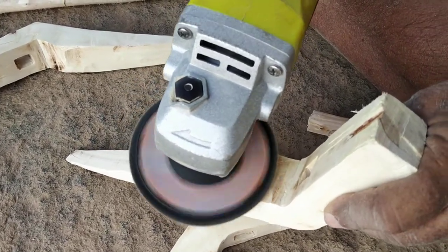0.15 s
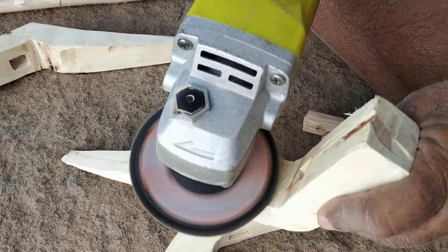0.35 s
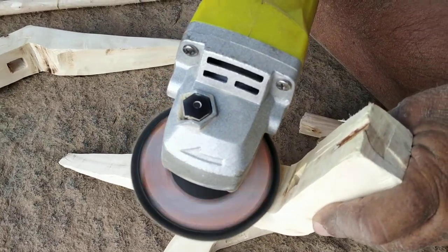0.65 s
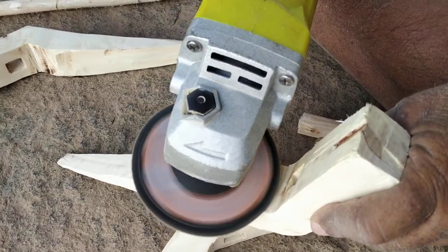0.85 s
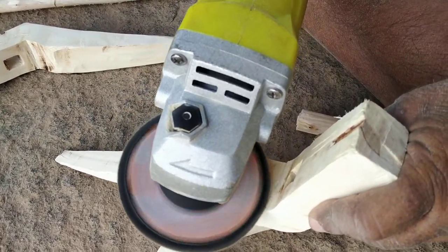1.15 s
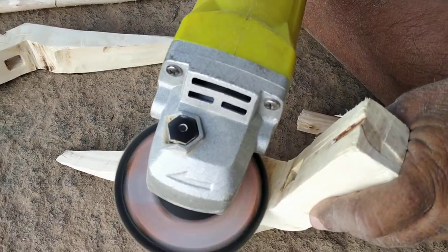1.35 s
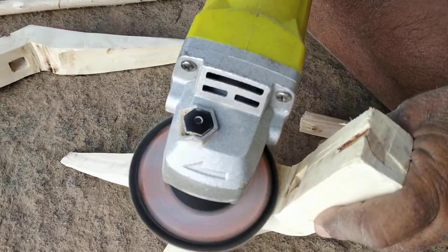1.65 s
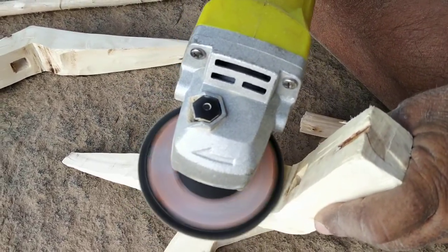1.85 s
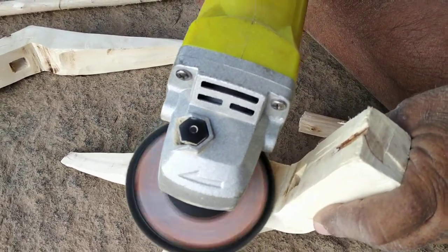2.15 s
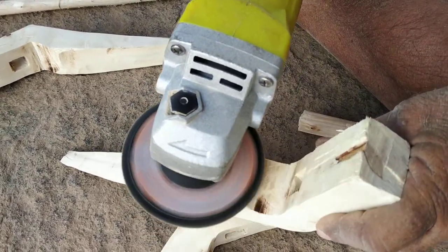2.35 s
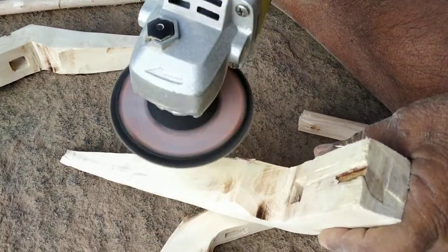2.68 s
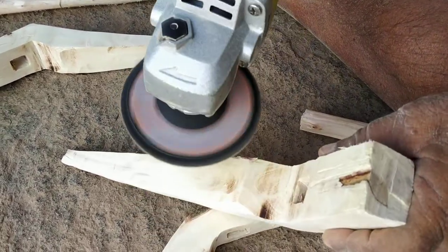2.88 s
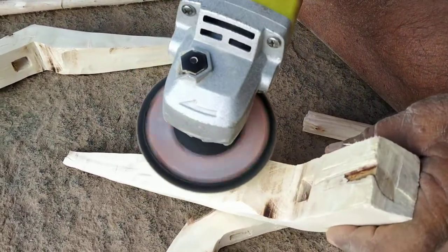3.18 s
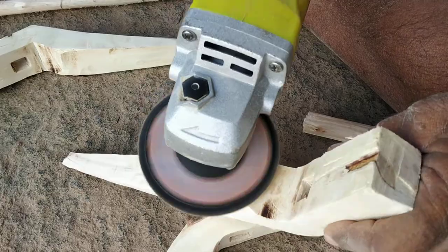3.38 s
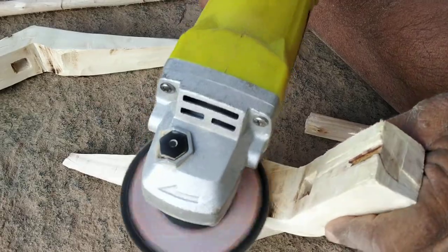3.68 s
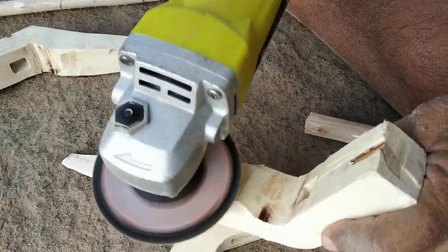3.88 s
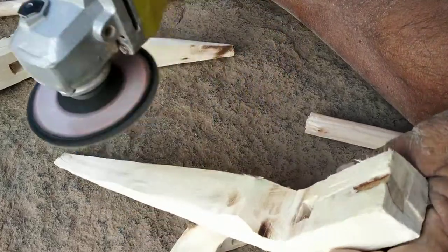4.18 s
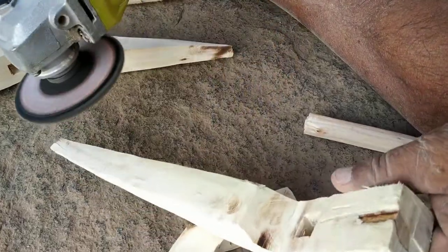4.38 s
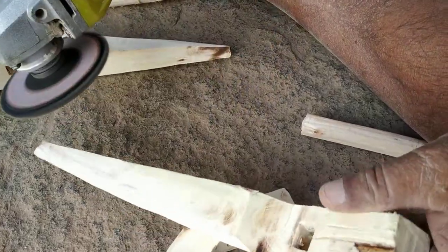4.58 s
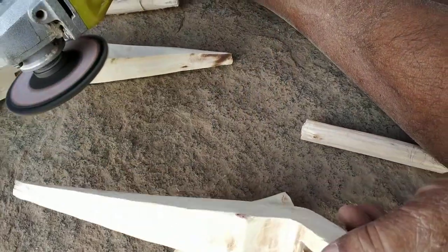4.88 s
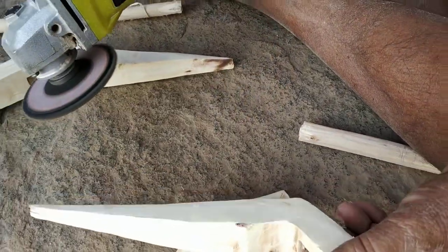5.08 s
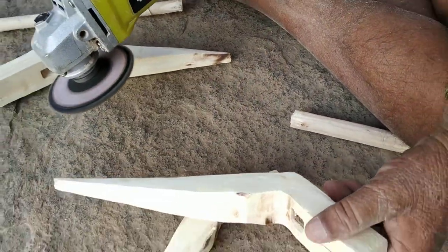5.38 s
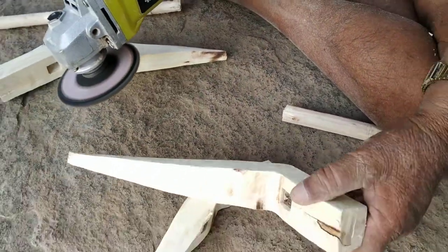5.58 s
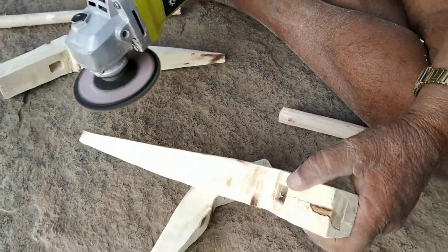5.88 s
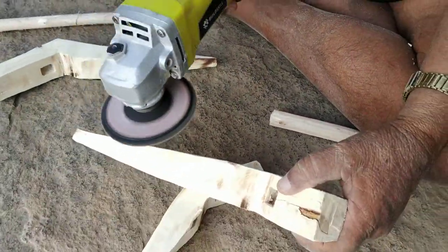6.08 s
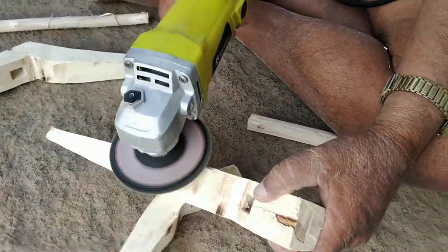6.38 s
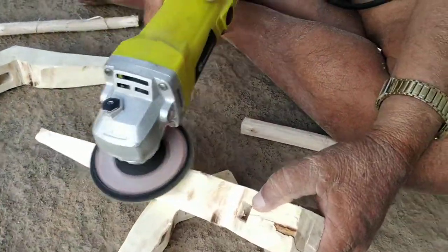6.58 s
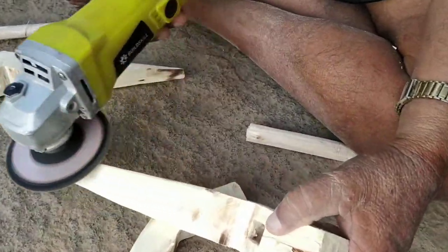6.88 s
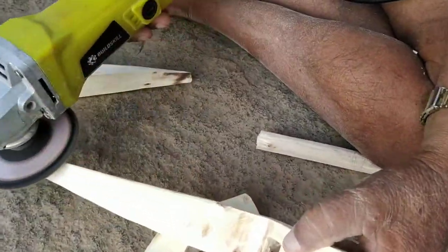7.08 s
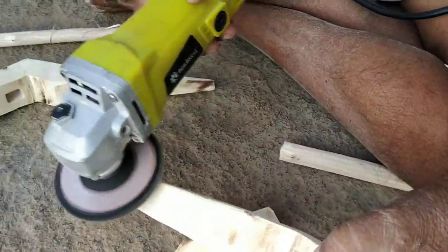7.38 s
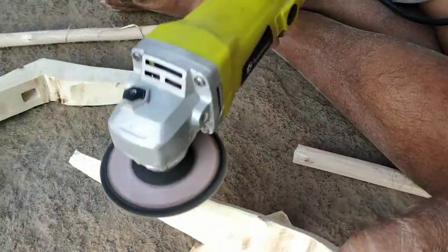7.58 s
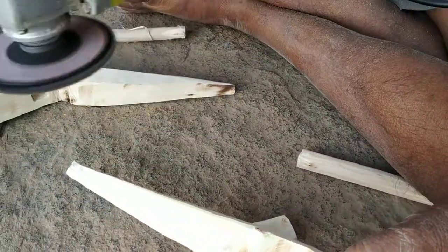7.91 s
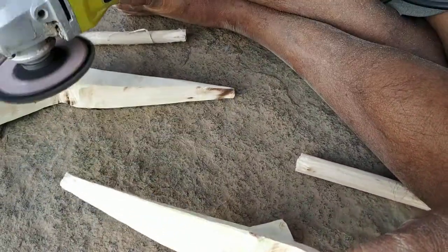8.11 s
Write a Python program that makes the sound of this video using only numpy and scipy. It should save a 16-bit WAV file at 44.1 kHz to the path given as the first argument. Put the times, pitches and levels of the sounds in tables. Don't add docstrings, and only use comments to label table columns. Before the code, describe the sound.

An angle grinder is already running loudly at the start, close to a stereo microphone, and never stops. From 0 to 2.3 s its sanding disc presses on and off a loose wooden piece: gritty, fast-pulsing rasp over roaring fan air, the whine sagging in pitch until about 1 s and staying low. Dull low wood knocks come at 0.2 s, the strongest, then around 1.05, 1.3, 1.9 and 2.1 s. Around 2.3 to 2.8 s the disc eases off, the pitch climbs and a high fan whistle briefly stands out. Light brushes last until about 3.6 s, with a faint knock near 3.5. It then runs free, steady, bright and hissy, with tones swelling as the tool turns. From 6.3 to 7.4 s it sands the thin tip, rasping more lightly with a small pitch dip, then releases and speeds up, still roaring at about 8.25 s. Dry, close sound with little echo.

```python
import sys
import numpy as np
from scipy import signal
from scipy.fft import rfft, irfft, next_fast_len
from scipy.io import wavfile
from scipy.ndimage import uniform_filter1d, map_coordinates

SR = 44100
rng = np.random.default_rng(int(sys.argv[2]) if len(sys.argv) > 2 else 0)


def volts_from_decibels(level):
    exponent = np.asarray(level, float) / 20
    return 10 ** exponent


def put_to_file(sound):
    columns = np.atleast_2d(sound).T
    safe = np.clip(columns, -1, 1)
    whole_steps = np.round(safe * 32767)
    wavfile.write(sys.argv[1], SR, whole_steps.astype(np.int16))


N = 363825
SIZE = next_fast_len(N)
HZ = np.fft.rfftfreq(SIZE, 1 / SR)
SECONDS = np.arange(N) / SR
GEAR = 36 / 11


def in_time(rows):
    s, *columns = np.transpose(rows)
    return [np.interp(SECONDS, s, c) for c in columns]


def at_hz(points, hz):
    points = np.array(points)
    return np.interp(np.log(hz + 1), np.log(points[:, 0]), points[:, 1])


def rms_one(x):
    return x / np.sqrt(np.mean(x ** 2) + 1e-20)


def pan(left_right_db):
    return volts_from_decibels(left_right_db * np.array([[.5], [-.5]]))


def drift(rate_hz):
    r = np.exp(-80 * np.pi * rate_hz / SR)
    noise = rng.standard_normal(N // 40 + 2002)
    slow = signal.lfilter([1], [1, -2 * r, r * r], noise)[2000:]
    return np.interp(np.arange(N) / 40, np.arange(len(slow)), rms_one(slow))


def to_cells(x):
    return signal.stft(x, SR, nperseg=1024)


def from_cells(cells):
    return signal.istft(cells, SR, nperseg=1024)[1][:, :N]


def fade_in_out(s, start_s, length_s, fade_s):
    return np.clip(np.minimum(s - start_s, start_s + length_s - s) / fade_s + .5, 0, 1)


def spans(rows, rest, ease_s=.11):
    out = np.full(N, float(rest))
    for start_s, length_s, value in rows:
        out[(SECONDS >= start_s) & (SECONDS < start_s + length_s)] = value
    return uniform_filter1d(out, int(ease_s * SR) + 1, mode="nearest")


# s, turns_per_s
DISC_SPEED = [(0.0, 161.6), (0.28, 159.6), (0.75, 150.6), (1.05, 146.9), (1.25, 147.4), (1.55, 149.5),
              (2.0, 147.0), (2.22, 149.3), (2.55, 159.2), (2.85, 164.0), (3.25, 166.9), (3.7, 165.1),
              (4.25, 167.7), (5.0, 168.75), (6.25, 169.3), (6.75, 163.9), (7.35, 164.5), (8.25, 168.3)]


def disc_turns():
    return np.cumsum(uniform_filter1d(in_time(DISC_SPEED)[0], size=6000)) / SR


# start_s, length_s, rasp_power_share (0-1)
TOUCHES = [
    (-.1, 0.96, 0.35),
    (.92, 0.56, 0.39),
    (1.5, 0.34, 0.34),
    (1.84, 0.2, 0.45),
    (2.06, 0.25, 0.26),
    (2.28, 0.99, 0.11),
    (3.3, 0.28, 0.16),
    (6.3, 0.7, 0.25),
    (7.02, 0.37, 0.21),
]


def contact_share():
    return np.clip(spans(TOUCHES, rest=.093), 0, .9)


def contact_load(share):
    bears_down_s, tip_s = .62, 4.5
    bearing = np.clip((SECONDS - bears_down_s) / .4 + .5, 0, 1)
    tip = SECONDS > tip_s
    return np.minimum(share * 1.59, 1) * np.array([1 - bearing, bearing * ~tip, tip])


# s, lag_ms
PORT_LAG = [(0, 0.11), (2.0, 0.11), (2.4, 0.095), (2.9, 0.1), (3.5, 0.056), (4.4, 0.23), (5.5, 0.15),
            (6.4, 0.094), (6.9, 0.267), (7.1, 0.19), (7.45, 0.094), (7.9, 0.21), (8.25, 0.18)]


def late(x):
    at = np.arange(N) - in_time(PORT_LAG)[0] * SR / 1000
    return np.array([map_coordinates(x, [at], order=3, mode="nearest"), x])


def scattered(x, t60_s, diffuse):
    hop, age_s = 24000, np.arange(1500) / SR
    out = np.zeros((2, N + 4 * hop))
    padded = np.pad(x, (hop, 2 * hop))
    window = np.sin(np.pi * np.arange(2 * hop) / (2 * hop))
    for start in range(0, N + hop, hop):
        echoes = rng.standard_normal((2, len(age_s))) * volts_from_decibels(-60 * age_s / t60_s)
        echoes = echoes / np.sqrt(np.sum(echoes ** 2, axis=1, keepdims=True))
        piece = padded[start:start + 2 * hop] * window
        out[:, start:start + 2 * hop + len(age_s) - 1] += signal.fftconvolve(piece[None], echoes, axes=1)
    far_room = rng.standard_normal((2, N))
    return np.sqrt(1 - diffuse) * out[:, hop:hop + N] + np.sqrt(diffuse) * far_room


# hz, left_right_db
PORT_SHADE = [(60, 7), (200, -0.5), (700, 3), (1100, -2), (1700, 3.5), (2400, 0), (3200, -1.5), (6000, 0.7),
              (9000, 1), (12000, 0.5), (13000, -4), (15000, -3)]
# hz, power_share (0-1)
DIRECT_SHARE = [(60, 0.5), (300, 0.8), (900, 0.93), (1500, .9), (2100, 0.077), (2900, 0.13), (3800, 0.15),
                (4700, 0.12), (7000, 0.25), (10500, 0.16), (15000, 0.12)]


def at_ports(source, spectrum, diffuse):
    direct = np.clip(at_hz(DIRECT_SHARE, HZ), 0, 1)
    own = scattered(source, t60_s=.045, diffuse=diffuse)
    mix = np.sqrt(direct) * rfft(late(source), SIZE) + np.sqrt(1 - direct) * rfft(own, SIZE)
    shade = pan(at_hz(PORT_SHADE, HZ))
    return rms_one(irfft(mix * shade * volts_from_decibels(at_hz(spectrum, HZ)), SIZE)[:, :N])


# hz, level_db (per Hz)
FAN_SPECTRUM = [(100, -48), (200, -18.5), (420, -12), (900, -7), (1700, -5.5), (2400, -3), (3200, -1.5),
                (5500, 1), (6900, -3), (8500, -1), (11800, -2.5), (12600, -4), (14000, -3.5), (15700, -3.5)]


def fan():
    return at_ports(rng.standard_normal(N), FAN_SPECTRUM, diffuse=.66)


# hz, level_db (per Hz)
GRIT_SPECTRUM = [(300, -22.5), (900, -12), (1700, -28), (2500, -3.5), (3200, 3.5), (6800, 2), (8500, 0.5),
                 (10900, 2), (12000, 2.5), (12600, 1.5), (15700, -4)]


def grit(turns):
    kept_per_turn, wobble = .955, .077
    fresh = rng.standard_normal((1500, 256))
    rim = signal.lfilter([1], [1, -kept_per_turn], fresh, axis=0)[60:].ravel()
    rasp = map_coordinates(rim, [turns * 256], order=3)
    rasp = rasp * (1 + wobble * np.cos(2 * np.pi * turns))
    return at_ports(rms_one(rasp), GRIT_SPECTRUM, diffuse=.08)


def shaken(x, turns, share):
    throb_db, rattles_per_s, rattle_db, rattle_s = 3.2, 60, 2.4, .0012
    slaps = (rng.random(N) < rattles_per_s / SR) * rng.exponential(1, N)
    burst = np.convolve(slaps, np.hanning(int(2 * rattle_s * SR) + 3), "same")
    throb = np.cos(2 * np.pi * turns) + .4 * np.cos(4 * np.pi * turns)
    return rms_one(x * volts_from_decibels(throb_db * share * throb + rattle_db * np.minimum(burst, 2)))


# s, level_db, vents_to_ports (0-1)
TOOL_HOLD = [(0, -13.5, 0.1), (1.0, -14, 0.55), (2.2, -14.5, 0.2), (2.5, -14.5, 0.98), (3.3, -15, 0.84),
             (4.0, -14.5, 0.57), (5.0, -15.0, 0.4), (5.9, -14.5, 0.47), (6.6, -15.5, 0.7),
             (7.5, -14.5, 0.5), (8.0, -14, 0.2), (8.25, -15, 0.1)]


def held(x, share, patchy_db, shared_db):
    (level_db, turn), speed = in_time(TOOL_HOLD), in_time(DISC_SPEED)[0]
    seated = np.clip((share - .15) / .031, 0, 1)
    low_db = .2 * seated - .12 * (speed.max() - speed) + .1
    housing_db = .5 * seated - 2 * turn + 2.5
    vents_db = 6.5 * share + 3.5 * turn - 1
    pan_db = 7 * in_time(PORT_LAG)[0] - 1.5 * seated + .2
    spectrum = rfft(x, SIZE)
    third = 3 * np.log2(np.clip(HZ, 250, 16000) / 250)
    out, together, near = 0, drift(12.6), drift(9.1)
    for k in range(19):
        band = irfft(spectrum * np.clip(1 - abs(third - k), 0, 1), SIZE)[:, :N]
        low = np.clip((7 - k) / 2, 0, 1)
        high = np.clip((k - 13.4) / 2, 0, 1)
        housing = np.clip((11 - k) / 2, 0, 1) - low
        last, near = near, drift(23.0)
        gain_db = low * low_db + housing * housing_db + high * vents_db
        out = out + volts_from_decibels(gain_db + patchy_db * (last + near) + shared_db * together) * band
    return out * volts_from_decibels(level_db - 1.5 * seated) * pan(pan_db)


# start_s, length_s, from_hz, to_hz, gain_db
LEFT_PEAKS_DIPS = [(-1, 0.46, 11400, 11400, 2), (3, 2, 10000, 10200, -3.5), (4.5, 1.8, 1050, 1040, -3),
                   (6, 0.77, 11700, 12000, 4), (4, 3.7, 450, 440, -2.5), (2.5, .7, 14500, 14800, -3),
                   (0, 2, 12000, 12000, 1), (6.5, 0.18, 3100, 3955, 4), (4, .9, 13500, 14000, -3),
                   (4.3, .7, 13500, 12500, 5), (0, 4.7, 2400, 2400, -5), (0.3, .8, 8260, 8200, 6.5),
                   (1.2, 0.64, 11000, 11000, 4.5), (2.5, 1.6, 1420, 1360, 7), (2, 1.6, 6100, 6100, 2.5),
                   (2, 0.74, 10300, 11400, 2.5), (4, 0.49, 1450, 1900, 5.5), (4.0, 2.1, 5800, 4100, 1.5),
                   (4.5, 1.4, 1770, 1810, 4), (4.9, 0.77, 5500, 4700, -0.5), (5.8, 0.64, 1300, 1400, 6),
                   (7.5, 0.89, 3260, 3350, 7), (7.5, 0.52, 1710, 2040, -8)]
RIGHT_PEAKS_DIPS = [(-2, .5, 11200, 11200, 2), (3.3, 1.7, 10000, 10100, -9), (-1.5, 8.3, 980, 1030, -3),
                    (6.5, .8, 12200, 11750, 3), (3.8, 3.6, 480, 480, -2.5), (0, .9, 13600, 13300, -1),
                    (0, 2.3, 11900, 12000, -4), (5.5, 0.24, 3300, 4000, -7), (3, 3.7, 15000, 12900, -4),
                    (4, 2.0, 15300, 15000, 0), (0, 2.5, 1900, 1740, -5), (.9, 0.47, 10700, 10900, 4),
                    (0.7, 0.74, 13200, 13200, 4), (1.8, .3, 13300, 13400, 6), (1.8, 0.2, 11000, 11000, 4.5),
                    (2.5, 2.05, 3300, 2900, 6), (5.5, 1.4, 3180, 3350, 0), (5.7, 0.55, 1300, 1450, -1),
                    (7.2, 1.05, 3100, 3200, 0), (10, 0.29, 1500, 1500, -3)]


def peaks_and_dips(x):
    hz, s, cells = to_cells(x)
    gain_db = np.zeros(cells.shape)
    for port, rows in enumerate((LEFT_PEAKS_DIPS, RIGHT_PEAKS_DIPS)):
        for start_s, length_s, from_hz, to_hz, db in rows:
            centre_hz = np.interp(s, [start_s, start_s + length_s], [from_hz, to_hz])
            width_hz = 78 + .021 * centre_hz
            bump = np.exp(-.5 * ((hz[:, None] - centre_hz) / width_hz) ** 2)
            gain_db[port] += db * fade_in_out(s, start_s, length_s, fade_s=.15) * bump
    return from_cells(cells * volts_from_decibels(gain_db))


# start_s, length_s, from_hz, to_hz, depth (above 0: ports in opposite phase, below 0: in phase)
PHASE_BANDS = [(0, .1, 4600, 4600, .45), (.2, .8, 4900, 4550, .45), (1.05, .35, 4550, 4500, .3),
               (1.6, .55, 4600, 4650, .4), (.55, .9, 4000, 4000, .3), (.3, .2, 3450, 3450, .35),
               (1.75, .4, 4100, 3950, .45), (2.15, .12, 4950, 5050, .3), (2.45, .7, 4550, 4600, .35),
               (2.35, .5, 2980, 2980, .6), (2.85, .7, 3000, 2950, .25), (3.9, .47, 2960, 2960, .65),
               (4.4, .2, 3000, 2950, .35), (4.65, .25, 2950, 2700, .7), (5.2, .18, 2950, 3050, .55),
               (5.41, .12, 2900, 2850, 1.1), (5.56, .33, 2750, 3000, .8), (5.3, .55, 3600, 3700, .4),
               (6.05, .4, 2880, 2850, .7), (6.48, .14, 3300, 3700, 1), (6.46, .17, 3650, 4050, 1),
               (6.66, .3, 2520, 2300, .65), (7.02, .12, 2300, 2450, .85), (7.2, .14, 2750, 2800, .7),
               (7.36, .15, 3100, 3250, .65), (7.8, .4, 2950, 2850, .25), (6.1, .4, 4800, 4900, .5),
               (4.35, .5, 5950, 5750, .5), (4.3, .8, 6500, 7200, .4), (2.45, .2, 7000, 7000, .6),
               (7.8, .3, 6900, 6900, .55), (0, 2.3, 7000, 6850, -.5), (2.7, .8, 6950, 6900, -.5),
               (0, 2.1, 5400, 5400, -.3), (3.1, .6, 3800, 3750, -.5), (.8, .8, 3700, 3600, -.4),
               (6.45, .25, 6200, 5800, -.7), (6.8, .45, 4000, 4800, -.6), (7.05, .3, 5200, 5900, -.5),
               (4.0, 1.6, 2350, 2400, -.35), (3.8, .3, 5500, 5500, -.5)]


def cancel(x):
    hz, s, cells = to_cells(np.array([x[0] + x[1], x[0] - x[1]]) / 2)
    wander_hz = 40 * np.interp(s, SECONDS, drift(8))
    depth = np.zeros(cells.shape[1:])
    for start_s, length_s, from_hz, to_hz, deep in PHASE_BANDS:
        centre_hz = np.interp(s, [start_s, start_s + length_s], [from_hz, to_hz]) + wander_hz
        width_hz = 230 * (.4 + .6 * abs(deep))
        bump = np.exp(-((hz[:, None] - centre_hz) / width_hz) ** 4)
        depth += deep * fade_in_out(s, start_s, length_s, fade_s=.05) * bump
    depth = np.clip(depth, -.97, .97)
    weak = 1 - abs(depth)
    strong = np.sqrt(2 - weak ** 2)
    gains = np.where(depth > 0, [weak, strong], [strong, weak])
    mid, side = from_cells(cells * gains)
    return np.array([mid + side, mid - side])


def tones(table, turns, load, waver_db, slip):
    out = 0
    for multiple, free_db, *wood_db, pan_db in table:
        level = volts_from_decibels(free_db - .5 + np.dot(wood_db, load) + waver_db * drift(1.37))
        phase = 2 * np.pi * (round(multiple) * turns + rng.random())
        wave = level * np.sin(phase + slip * np.sqrt(multiple) * drift(40.0))
        out = out + wave * pan(pan_db)
    return out


# shaft_multiple, free_db, landing_add_db, bearing_add_db, tip_add_db, left_right_db
DISC_TONES = [(0.993, -54.5, 0, -9, -11, 2), (3, -65.5, 9, 19, -16, -7), (4.05, -41, 10, -7, -17, -1.5),
              (5, -39, -13, -14, -26, -2.5), (7, -52.5, 25, 8, -12, 2), (8, -45, 8, 13, -6, 2),
              (10, -51, 3, 13, -14, 5), (12, -71, 0, -3, 15, 12), (13.1, -55, -7, -16, 9, 16),
              (15, -51, 14, 17.5, -22, -15), (21, -44, 9, 7, 11, -15), (23, -57, -5, 21, -1, 0),
              (25, -53, 2, -10, 32, 12), (55, -56, 19, 32, -13, 23), (29, -64, 3, 43, 5, -13),
              (60, -60, 9, 44, 6, 8), (72.2, -61.5, 4, 23, 70, 12), (73.4, -46, 7, 32, 10, 1)]
MOTOR_TONES = [(1, -36, -10, -23.5, -20, 0), (2, -70, -4, -13, -7, -5), (3, -43.5, -5, 2, -26, 10.5),
               (5, -44.5, -14, -12, -14, 17), (12.07, -38.5, -17, 12, -1, 3), (14, -66, -18, -6, -6, 0)]


def whine(turns, load):
    ripple_hz, ripple_db = 120, -47
    disc = tones(DISC_TONES, turns, load, waver_db=2.2, slip=.2)
    motor = tones(MOTOR_TONES, turns * GEAR, load, waver_db=1.3, slip=.2)
    beat_turns = turns * GEAR - ripple_hz * SECONDS
    beat = tones([(1, ripple_db, -14, -14, -6, 2)], beat_turns, load, waver_db=1.8, slip=.3)
    return disc + motor + beat


# s, level_db, left_right_db
BLADE_WHISTLE = [(0, -36, -6), (.3, -33, -10), (.6, -29, -12), (.95, -33, -12), (1.5, -31, -12),
                 (2.1, -32, -10), (2.4, -30, -7), (2.58, -22.5, -3), (2.75, -30, -4)]


def whistle(motor_turns):
    level_db, pan_db = in_time(BLADE_WHISTLE)
    tone = tones([(30, 0, 0, 0)], motor_turns, np.zeros((1, 1)), waver_db=.7, slip=.1)
    return volts_from_decibels(level_db) * pan(pan_db) * tone


# start_s, length_s, shaft_multiple, level_db, left_right_db
MOTOR_BEAMS = [
    (3.7, 2.6, 3, -41, 12),
    (5.9, .5, 2, -46, 4),
    (7.3, .3, 2, -44, 2),
    (7.6, .45, 2, -39, 2),
    (3.5, .5, 2, -46, 2),
    (4.3, 1.5, 2, -47, -5),
]
DISC_BEAMS = [(.7, 1.2, 3, -50, 0), (1.9, 1.2, 3, -47, 0), (3.1, 3.4, 3, -54, 0), (1.1, .75, 4, -46, 0),
              (1.15, .5, 5, -45, 0), (3.2, 2.0, 7, -45, 9), (5.6, .7, 7, -47, 6), (.75, .5, 7, -45, 0),
              (.65, .3, 65, -36, 0), (.95, .25, 68, -33, 0)]


def beamed(table, turns):
    out = 0
    for start_s, length_s, multiple, level_db, pan_db in table:
        row = [(multiple, level_db, 0, pan_db)]
        tone = tones(row, turns, np.zeros((1, 1)), waver_db=1.5, slip=.2)
        out = out + spans([(start_s, length_s, 1)], rest=0) * tone
    return out


# start_s, peak_db, pitch_hz
WOOD_KNOCKS = [
    (0.195, -30.5, 220),
    (1.045, -38, 266),
    (1.317, -43, 299),
    (1.921, -38, 207),
    (2.087, -38, 222),
    (3.491, -46, 229),
]


def knocks(t60_s):
    thud_hz, thud_db, attack_s = 60, -5, .0027
    out = np.zeros(N)
    for start_s, peak_db, pitch_hz in WOOD_KNOCKS:
        start = round(start_s * SR)
        age_s = np.arange(min(4000, N - start)) / SR
        ring = np.sin(2 * np.pi * pitch_hz * age_s)
        thud = volts_from_decibels(thud_db) * np.sin(2 * np.pi * thud_hz * age_s)
        decay = volts_from_decibels(peak_db - 60 * age_s / t60_s)
        out[start:start + len(age_s)] += decay * (ring + thud) * np.minimum(age_s / attack_s, 1)
    return out


def scene():
    turns = disc_turns()
    motor_turns = turns * GEAR
    share = contact_share()
    noise = np.sqrt(1 - share) * fan() + np.sqrt(share) * grit(turns)
    noise = held(shaken(noise, turns, share), share, patchy_db=.22, shared_db=.5)
    tonal = whine(turns, contact_load(share)) + whistle(motor_turns) + beamed(DISC_BEAMS, turns)
    tool = cancel(peaks_and_dips(noise) + tonal)
    return tool + beamed(MOTOR_BEAMS, motor_turns) + volts_from_decibels(3.0) * knocks(t60_s=.06)


# hz, cell_share (0-1)
LOST_HISS = [(1800, 0), (2600, .08), (4000, .15), (5300, .12), (6600, .24), (8300, .14), (9500, .15),
             (11500, .08), (12500, .34), (14500, .33), (15700, .22)]
# start_s, length_s, from_hz, to_hz, added_share
LOST_SPOTS = [(0, .9, 13000, 14000, .15), (0, .5, 8500, 10200, .12), (2.05, .35, 8900, 10400, .15),
              (3.2, .45, 9000, 10500, .22), (4.2, .8, 9500, 10500, .25), (5.65, .2, 9000, 9900, .2),
              (6.5, .5, 8000, 9800, .15), (2.0, 3.4, 12300, 13500, .15), (2.4, .7, 14000, 15000, .2),
              (7.2, 1.1, 12400, 13200, .15), (0, 2.3, 5900, 6700, .1), (4.2, .9, 5700, 7400, .1)]


def thin_hiss(x, drop_db):
    spared_db = 6
    hz, s, cells = to_cells(x)
    luck = rng.random((len(hz) // 2 + 1, cells.shape[2] // 5 + 1))
    luck = luck.repeat(2, axis=0).repeat(5, axis=1)[:len(hz), :cells.shape[2]]
    power = uniform_filter1d(np.sum(abs(cells) ** 2, axis=0), size=5, axis=1)
    plain = power < volts_from_decibels(2 * spared_db) * uniform_filter1d(power, size=31, axis=0)
    share = np.repeat(at_hz(LOST_HISS, hz)[:, None], len(s), axis=1)
    for start_s, length_s, from_hz, to_hz, more in LOST_SPOTS:
        in_band = (hz > from_hz) & (hz < to_hz)
        in_span = (s > start_s) & (s < start_s + length_s)
        share += more * np.outer(in_band, in_span)
    return from_cells(cells * np.where(plain & (luck < share), volts_from_decibels(drop_db), 1))


def low_pass(x):
    return signal.sosfilt(signal.butter(12, 17080, fs=SR, output="sos"), x)


def record(dry):
    rumble_hz, cutoff_hz = 158, 15770
    band = (HZ < cutoff_hz) / np.sqrt(1 + (rumble_hz / (HZ + 1)) ** 6.5)
    rounded = 1.3 * np.tanh(dry / 1.12)
    cut = irfft(rfft(rounded, SIZE) * band, SIZE)[:, :N]
    return low_pass(thin_hiss(cut, drop_db=-20))


dry = scene()
out = record(dry)
put_to_file(out)
```